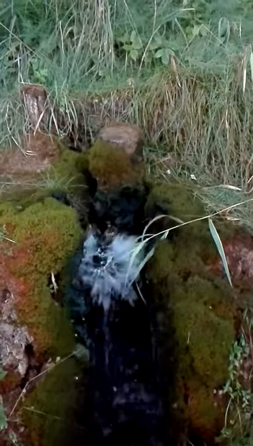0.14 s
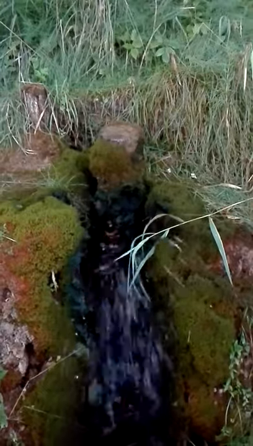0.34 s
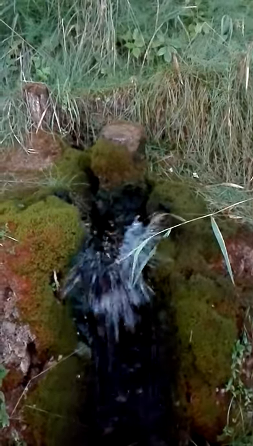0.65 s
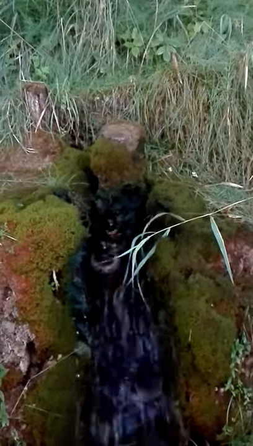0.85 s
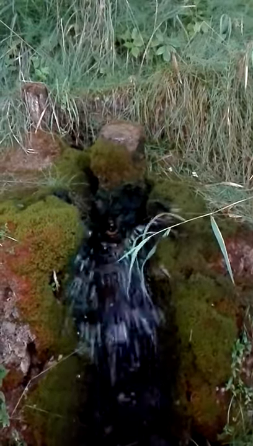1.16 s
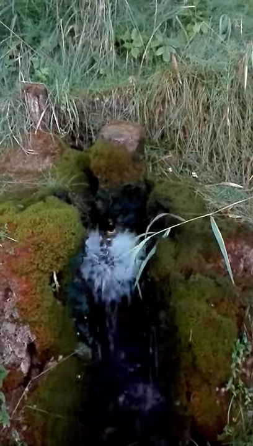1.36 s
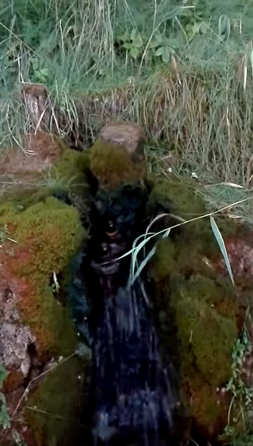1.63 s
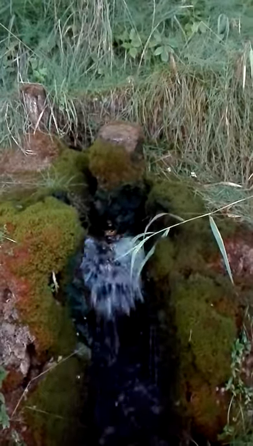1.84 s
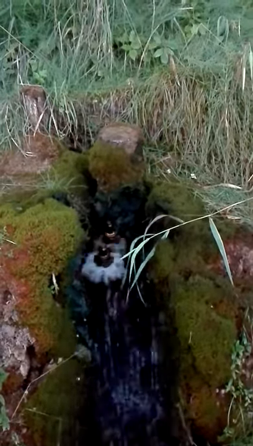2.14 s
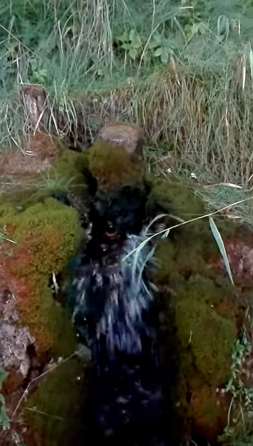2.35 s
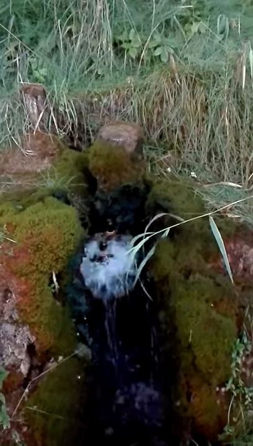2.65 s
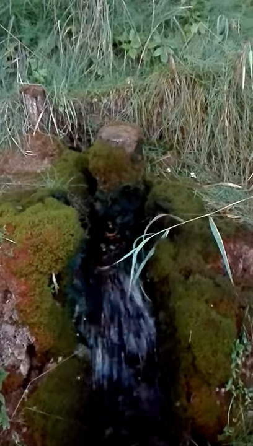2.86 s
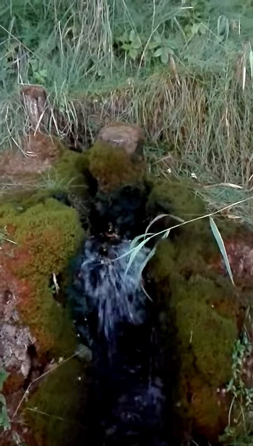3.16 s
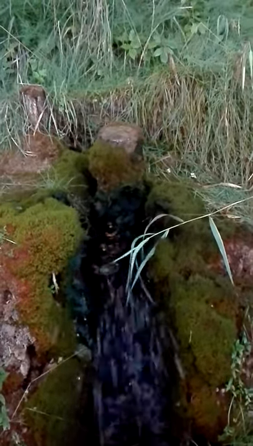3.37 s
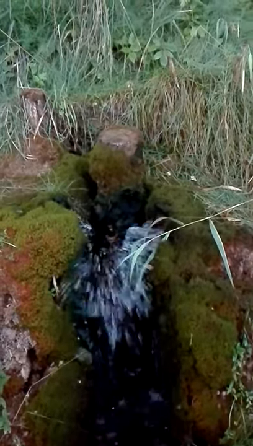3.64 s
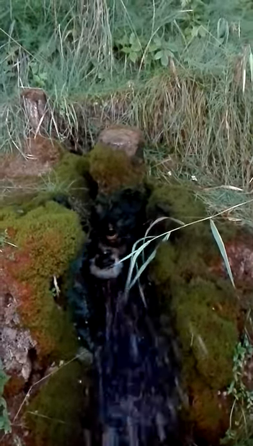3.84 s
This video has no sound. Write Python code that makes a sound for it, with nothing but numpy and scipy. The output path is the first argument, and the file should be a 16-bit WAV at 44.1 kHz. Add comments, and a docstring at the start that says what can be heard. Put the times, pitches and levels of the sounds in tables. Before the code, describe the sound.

A water-driven ram pump knocks every 0.43 seconds: a jet hisses up, the valve clacks shut with a deep thump, then water splashes and drains down a stone channel outdoors, closely miked in stereo.

```python
"""Ram pump in a stone channel

Water jets from the waste valve, louder as it speeds up, until the valve squeals and clacks shut: coloured noise
and struck modes. The shock thumps the body, returns inverted along the feed pipe and leaves a buzz: decaying
sines. Thrown water splashes and drains amid drops, gurgles, trickle and rumble: noise, bubbles and short rings."""
import sys
import numpy as np
from scipy import signal
from scipy.fft import rfft, irfft
from scipy.io import wavfile
from scipy.ndimage import uniform_filter1d

SR = 44100
rng = np.random.default_rng(int(sys.argv[2]) if len(sys.argv) > 2 else 0)


def to_wav(sig):
    """Store sig (one row per channel, or 1-D mono) as 16-bit WAV at the path in sys.argv[1].

    Samples outside -1..1 are clipped; the rate is SR.
    """
    pcm = np.clip(np.atleast_2d(sig), -1, 1) * 32767
    pcm = np.round(pcm).astype(np.int16)
    wavfile.write(sys.argv[1], SR, pcm.T)  # frames by channels


def gain_from_decibels(decibels):
    """Convert decibel values to linear amplitude factors."""
    exponent = np.asarray(decibels, float) / 20
    return 10 ** exponent


N = 176400
T = np.arange(N) / SR

# low background rumble: hz, gain_db
RUMBLE_CURVE = [(15, -24), (30, -10), (70, -1), (150, -14.5), (250, -12), (400, -51)]
# steady trickle: hz, gain_db
TRICKLE_CURVE = [(200, -45), (330, 4), (480, -21.5), (1300, -23.5), (2100, -14.5), (2800, -5), (5000, -7),
                 (6500, -6), (10000, -9), (15000, -6.5)]
RUMBLE_DB, TRICKLE_DB = -70.5, -62

# water gurgling in hollows: start_s, length_s, pitch_hz, width_hz, level_db
GURGLES = [(0.228, 0.048, 1840, 90, -64), (0.276, 0.015, 1330, 44, -52), (0.303, 0.023, 1660, 100, -58),
           (0.451, 0.022, 1180, 95, -45), (0.502, 0.16, 1080, 270, -63.5), (0.954, 0.057, 1500, 324, -50),
           (1.04, 0.056, 1140, 83.33, -57.5), (1.804, 0.1, 1204, 324, -51.5),
           (2.244, 0.13, 925.9, 216, -59), (2.75, 0.066, 1134, 120, -64), (3.402, 0.11, 484, 27.78, -68),
           (3.51, 0.018, 481.5, 60, -60), (3.563, 0.035, 575, 120, -53), (3.499, 0.15, 734, 64.8, -64),
           (0.637, 0.069, 633, 80, -61.5), (2.217, 0.06, 534, 55.56, -60.5),
           (2.68, 0.13, 648.1, 138.9, -64), (.1, 0.072, 754, 162, -59.5)]
# single drops on stone: start_s, level_db, start_pitch_hz, t60_s, tick_re_level_db
DROPS = [(0.016, -26.5, 1680, 0.015, -21), (0.342, -36, 1850, 0.039, -10), (0.374, -30, 3630, 0.029, -24),
         (0.436, -21, 2490, 0.017, -7.5), (0.77, -31.5, 6460, 0.015, -7.5), (0.889, -34, 1070, 0.06, -15),
         (1.616, -48.5, 7300, 0.03, 7), (2.387, -36, 4600, 0.016, -12), (2.453, -37.5, 1880, 0.04, -4),
         (2.533, -36, 2930, 0.06, -2), (2.914, -36.5, 2460, 0.013, -4), (3.109, -34.5, 4930, 0.06, 0),
         (3.325, -38, 2680, 0.021, -3), (3.342, -34, 2710, 0.026, -10), (3.762, -40.5, 3500, 0.048, -8.5)]

# splash after each slam: level_db, hold_s, drain_db_per_s, spray_s
SPLASHES = [(-45, 0.12, -84, 0.14), (-45, 0.033, -55, 0.082), (-47, 0.11, -90, 0.13),
            (-44, 0.079, -78, 0.15), (-44, 0.045, -74, 0.11), (-43, 0.05, -73, 0.097),
            (-43.5, 0.052, -65, 0.074), (-45, 0.037, -57, 0.11), (-43.5, .07, -84, .1),
            (-44, 0.053, -86, 0.05)]
# splash: hz, gain_db
SPLASH_CURVE = [(240, -19), (400, -21.5), (670, -9), (791, -13), (964, -3.5), (1390, -2), (2290, -0.5),
                (3050, -2), (4880, 3), (9960, -3.5), (13500, -4), (15000, -21)]
SPLASH_RISE_S, TREBLE_HZ = 0.004, 3380
SPRAY_FADE_DB_PER_S, SPRAY_END_S, SPRAY_REST_DB = -30, 0.025, -8

# jet before each slam: lead_s, rise_s, level_db
JETS = [(0.21, .05, -46.5), (0.2, 0.092, -43.5), (0.17, 0.051, -44), (0.22, 0.11, -45.5),
        (0.165, 0.049, -45), (0.2, 0.088, -45.5), (0.18, 0.039, -45), (0.2, 0.093, -44),
        (0.2, 0.082, -45.5), (0.22, 0.1, -47)]
# jet: hz, gain_db
JET_CURVE = [(290, -48), (500, -33), (724, -15.5), (896, -19.5), (1080, -10), (1610, -7.5), (1930, -3.5),
             (2260, -5), (3090, 0), (6570, -3), (13600, -11), (15000, -17)]
JET_GROW_DB, JET_CUT_S = 1.5, 0.028

# air chamber buzzing after each thump: settled_pitch_hz, level_db, rattle_db, rattle_stop_s
BUZZES = [(65.2, -44, 8, 0.21), (63.3, -37.5, 2, 0.28), (61.9, -39, -0.5, 0.21), (63.85, -39.5, 5, 0.184),
          (64.2, -38.5, 2.5, 0.21), (64.4, -40.5, 6, 0.188), (63.65, -42.5, 10, 0.2), (66, -41.5, 9, 0.16),
          (64.1, -43, 5.5, 0.48), (64.1, -41, 7, .2)]
# buzz multiples 1 to 8: gain_db, t60_s
BUZZ_ORDERS = [(4.5, 0.6), (-6.5, 0.82), (-16, 0.98), (-22, 1), (-22.5, 0.47), (-31.5, 0.48), (-37, 0.32),
               (-56, 0.27)]
BUZZ_RISE_S, BUZZ_SAG = 0.05, 0.04  # sag: extra pitch at the start, as a fraction
FLUTTER_DB, RATTLE_FLUTTER_DB = 2, 3.5
HOLLOW_HZ, HOLLOW_FALL_HZ_PER_S, HOLLOW_DB, HOLLOW_WIDTH_HZ = 458, 640, 8, 45

# thumps of the pump body: start_s
THUMPS = [.0472, 0.4766, .907, 1.336, 1.7656, 2.1949, 2.6262, 3.056, 3.4833, 3.9131]
# pump body modes: start_pitch_hz, level_db, t60_s, first_swing (signed factor)
BODY = [(42.3, -47.5, 0.22, 0.93), (64, -31.5, 0.083, -0.93), (100.3, -24.5, 0.036, 0.87),
        (120.6, -44, 0.41, -1.25), (145.2, -31.5, 0.24, -0.4), (195.4, -33.5, 0.13, 0.46),
        (234.2, -41.5, 0.24, -0.68), (313, -53, 0.081, 0.85)]
RETURN_S, RETURN_DB, DETUNE = 0.03405, 0.2, 0.0061  # detune: spread of the pitch drift, as a fraction

# valve slams: start_s, clack_db, colour_hz, squeal_db, thump_db
SLAMS = [(.0452, -19, 2100, -33, 0), (.4750, -27, 1500, -34, 0), (.9044, -20, 2300, -33, 0),
         (1.3332, -22, 1780, -37, 0), (1.7600, -24, 1360, -33, 0), (2.1913, -21, 2340, -37, 0),
         (2.6230, -28, 1310, -37, 0), (3.0480, -26, 1220, -34, 0), (3.4811, -27, 1780, -38, 0),
         (3.9101, -27, 1030, -37, 0)]
# valve modes: pitch_hz, damping_hz, gain_db
VALVE = [(1320, 340, 0), (1790, 510, 12), (2320, 280, 4.5), (3110, 260, 10.5), (3790, 390, 13.5),
         (3770, 1100, -26)]
# the small valve radiates little bass: hz, gain_db
OPEN_AIR = [(200, -17), (700, -7.5), (1000, 2), (15000, 7.5)]
SQUEAL_RISE_S, SQUEAL_FALL_S, SQUEAL_AIR_DB = 0.0078, 0.012, -10
COLOUR_DB, COLOUR_OCT = 19.5, 0.29  # boost of the modes near each slam's colour_hz

# scattered side signal: hz, side_re_mid_db
SIDE_CURVE = [(60, -38), (150, -54), (370, -58), (930, -34.5), (2340, -58), (5830, -14.5), (14600, -7.5)]
# microphone response: hz, gain_db
MIC = [(20, 3), (7500, 0.5), (8800, -2.5), (9200, -4.5), (12000, -6), (14000, -4), (16000, 6)]
EDGE_HZ = 14400


def evened(x):
    """Scales to unit rms."""
    return x / np.sqrt(np.mean(x ** 2) + 1e-20)


def add(mix, start_s, sound):
    """Adds sound to mix in place, cut at the end of mix."""
    part = mix[round(start_s * SR):][:len(sound)]
    part += sound[:len(part)]


def colour(x, points):
    """Filters x by a (hz, gain_db) curve, interpolated over log frequency."""
    curve_hz, db = np.transpose(points)
    hz = np.fft.rfftfreq(len(x), 1 / SR)
    gain = gain_from_decibels(np.interp(np.log(hz + 1), np.log(curve_hz + 1), db))
    return irfft(rfft(x) * gain, len(x))


def water(points, grain_db, per_s, spread_db, cycles, patchy_db, flicker_db):
    """Hiss in drifting patches, flickering as drops land, plus many tiny bubbles with rising pitch."""
    _, t, z = signal.stft(rng.standard_normal(N), nperseg=256, noverlap=192)
    patches = uniform_filter1d(rng.standard_normal(z.shape), size=5, axis=0)
    patches = evened(uniform_filter1d(patches, size=20, axis=1))
    flicker = evened(uniform_filter1d(rng.standard_normal(len(t)), size=4))
    gain = gain_from_decibels(patchy_db * patches + flicker_db * flicker)
    hiss = signal.istft(z * gain, nperseg=256, noverlap=192)[1][:N]

    bubbles = np.zeros(N)
    for hz in np.geomspace(500, 6000, num=24):
        u = np.arange(0, 25 * SR / hz) * hz / SR  # time in cycles
        shape = np.minimum(u, 1) * np.exp(-u / cycles) * np.sin(2 * np.pi * u * (1 + 0.00484 * u))
        births = rng.random(N) < per_s / 24 / SR
        train = births * gain_from_decibels(spread_db * np.minimum(rng.exponential(1, N), 3))
        bubbles += signal.oaconvolve(train, shape)[:N]
    return evened(colour(evened(hiss) + gain_from_decibels(grain_db) * evened(bubbles), points))


def rumble():
    """Steady noise confined to the bass."""
    return gain_from_decibels(RUMBLE_DB) * evened(colour(rng.standard_normal(N), RUMBLE_CURVE))


def trickle():
    """Steady thin flow of hiss and sparse bubbles."""
    return gain_from_decibels(TRICKLE_DB) * water(TRICKLE_CURVE, grain_db=-8, per_s=400, spread_db=3.5, cycles=5,
                                   patchy_db=2, flicker_db=1.2)


def gurgles():
    """Uneven bubbling excites one hollow for a moment."""
    out = np.zeros(N)
    for start_s, length_s, hz, width_hz, db in GURGLES:
        t = np.arange(0, length_s + 0.0097, 1 / SR)
        swell = np.sin(np.pi * np.minimum(t / length_s, 1)) ** 0.5
        drive = rng.standard_normal(len(t)) * swell
        ring = np.exp(-np.pi * width_hz * t) * np.sin(2 * np.pi * hz * t)
        add(out, start_s, gain_from_decibels(db) * evened(signal.fftconvolve(drive, ring)[:len(t)]))
    return out


def drops():
    """A tick and a short rising ring for each drop."""
    out, t = np.zeros(N), np.arange(0, 0.05, 1 / SR)
    for start_s, db, hz, t60_s, tick_db in DROPS:
        tone = np.sin(2 * np.pi * hz * t * (1 + 3 * t))
        tick = gain_from_decibels(tick_db) * evened(colour(rng.standard_normal(len(t)), JET_CURVE))
        env = gain_from_decibels(db - 60 * t / t60_s) * np.minimum(t / 0.0012, 1)
        add(out, start_s, env * (0.7 * tone + tick))
    return out


def splash():
    """Thrown water lands, holds and drains; the fine spray in the treble stops sooner."""
    x = water(SPLASH_CURVE, grain_db=-3.5, per_s=1100, spread_db=5.5, cycles=4.3, patchy_db=2, flicker_db=2)
    low = signal.sosfiltfilt(signal.butter(2, TREBLE_HZ, fs=SR, output="sos"), x)
    treble = x - low
    out = np.zeros(N)
    for (slam_s, *_), (db, hold_s, drain_db_per_s, spray_s) in zip(SLAMS, SPLASHES):
        t = T - slam_s
        drain = gain_from_decibels(drain_db_per_s * np.maximum(t - hold_s, 0))
        spraying = 1 / (1 + np.exp(np.clip((t - spray_s) / SPRAY_END_S, -50, 50)))
        spray = spraying * gain_from_decibels(SPRAY_FADE_DB_PER_S * np.maximum(t, 0))
        spray += (1 - spraying) * gain_from_decibels(SPRAY_REST_DB) * drain
        out += np.clip(t / SPLASH_RISE_S, 0, 1) * gain_from_decibels(db) * (low * drain + treble * spray)
    return out


def jet():
    """The jet opens, grows as the water speeds up and is cut by the slam."""
    env = np.zeros(N)
    for (slam_s, *_), (lead_s, rise_s, db) in zip(SLAMS, JETS):
        t = T - slam_s
        opening = np.clip((t + lead_s) / rise_s, 0, 1) ** 2
        growth = gain_from_decibels(db + JET_GROW_DB * np.minimum(t, 0) / lead_s)
        env += opening * growth * np.exp(-np.maximum(t, 0) / JET_CUT_S)
    return env * water(JET_CURVE, grain_db=-4, per_s=1800, spread_db=3, cycles=4, patchy_db=1.8, flicker_db=1.5)


def buzz():
    """Sagging stack of multiples: the lowest two hum on, the rest rattle through a falling hollow and stop."""
    out, t = np.zeros(N), np.arange(0, 0.6, 1 / SR)
    order_db, t60_s = np.transpose(BUZZ_ORDERS)[:, :, None]
    k = np.arange(1, len(t60_s) + 1)[:, None]
    for start_s, (hz, db, rattle_db, stop_s) in zip(THUMPS, BUZZES):
        knots_db = rng.normal(0, 1, (len(k), 20)) * np.where(k > 2, RATTLE_FLUTTER_DB, FLUTTER_DB)
        flutter_db = np.array([np.interp(t, np.linspace(0, 0.6, num=20), row) for row in knots_db])
        off_hz = k * hz - (HOLLOW_HZ - HOLLOW_FALL_HZ_PER_S * t)
        hollow_db = HOLLOW_DB * np.exp(-(off_hz / HOLLOW_WIDTH_HZ) ** 2)
        rattle = gain_from_decibels(rattle_db + hollow_db) / (1 + np.exp((t - stop_s) / 0.005))
        level = np.where(k > 2, rattle, 1) * gain_from_decibels(db + order_db + flutter_db - 60 * t / t60_s)
        level = level * np.clip(t / BUZZ_RISE_S, 0, 1) ** 2
        turns = np.cumsum(hz * (1 + BUZZ_SAG * np.exp(-t / 0.07))) / SR
        add(out, start_s, -(level * np.sin(2 * np.pi * k * turns)).sum(0))
    return out


def thumps():
    """Each shock rings the body twice: directly, and inverted when it returns along the feed pipe."""
    out, t = np.zeros(N), np.arange(0, 0.8, 1 / SR)
    hz, db, t60_s, swing = np.transpose(BODY)[:, :, None]
    for start_s, (*_, thump_db) in zip(THUMPS, SLAMS):
        drift = 1 + DETUNE * rng.normal(0, 1, (len(BODY), 1)) * np.minimum(t / 0.16, 1)
        modes = swing * gain_from_decibels(db - 60 * t / t60_s) * np.sin(2 * np.pi * hz * np.cumsum(drift, axis=1) / SR)
        ring = gain_from_decibels(thump_db) * modes.sum(0)
        add(out, start_s, ring)
        add(out, start_s + RETURN_S, -gain_from_decibels(RETURN_DB) * ring)
    return out


def valve():
    """Water squeezed through the closing gap excites the valve, then it clacks on its seat."""
    out, t = np.zeros(N), np.arange(-0.04, 0.05, 1 / SR)
    since = t - t[0]
    seated = t >= 0
    for slam_s, clack_db, colour_hz, squeal_db, _ in SLAMS:
        noise = rng.standard_normal(len(t))
        lean = rng.normal(0, 1, (len(VALVE), 2))  # pitch and level scatter of each mode
        rings, clack = np.zeros(len(t)), np.zeros(len(t))
        for (hz, damping_hz, db), (pitch_lean, level_lean) in zip(VALVE, lean):
            gain = gain_from_decibels(db + COLOUR_DB * np.exp(-(np.log2(hz / colour_hz) / COLOUR_OCT) ** 2))
            ring = np.exp(-2 * np.pi * damping_hz * since)
            ring *= np.sin(2 * np.pi * hz * (1 + 0.01 * pitch_lean) * since)
            rings += gain * gain_from_decibels(level_lean) * evened(signal.fftconvolve(noise, ring)[:len(t)])
            clack += gain * seated * np.exp(-0.7 * np.pi * damping_hz * abs(t)) * np.sin(2 * np.pi * hz * t)
        burst = seated * np.exp(-abs(t) / 0.0015) * evened(colour(noise[::-1], JET_CURVE))
        clack += 0.8 * burst * abs(clack).max() / 9
        air = gain_from_decibels(SQUEAL_AIR_DB) * evened(colour(noise, SPLASH_CURVE))
        env = np.exp(np.where(t < 0, t / SQUEAL_RISE_S, -t / SQUEAL_FALL_S))
        squeal = env * evened(air + evened(rings))
        add(out, slam_s + t[0], gain_from_decibels(clack_db) * clack / abs(clack).max() + gain_from_decibels(squeal_db) * squeal)
    return colour(out, OPEN_AIR)


def scene():
    """All sources in the middle; treble scattered by the stones and grass differs left to right."""
    mid = rumble() + trickle() + gurgles() + drops() + splash() + jet() + buzz() + thumps() + valve()
    z = signal.stft(mid, nperseg=256, noverlap=192)[2]
    random_phase = np.exp(2j * np.pi * rng.random(z.shape))
    scattered = signal.istft(z * random_phase, nperseg=256, noverlap=192)[1][:N]
    side = 2 * colour(scattered, SIDE_CURVE)
    return np.array([mid + side, mid - side])


def roll_off(x):
    """The treble ends steeply here."""
    return signal.sosfilt(signal.butter(12, 15170, fs=SR, output="sos"), x)


def record(dry):
    """Microphone colour, then a linear-phase low-pass at the band edge."""
    heard = [colour(channel, MIC) for channel in dry]
    low_pass = signal.firwin(511, EDGE_HZ, window=("kaiser", 9), fs=SR)
    mix = signal.oaconvolve(heard, low_pass[None], "same")
    return roll_off(mix)


dry = scene()
out = record(dry)
to_wav(out)
```